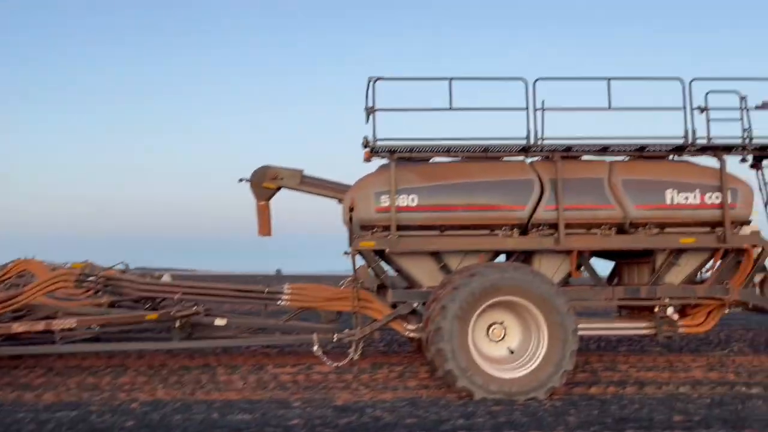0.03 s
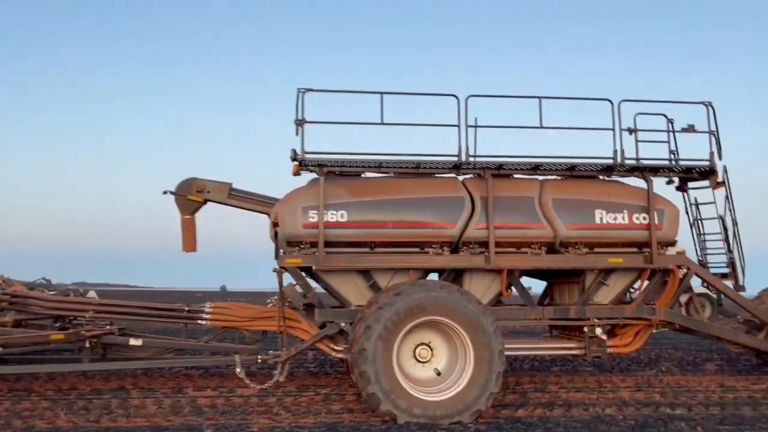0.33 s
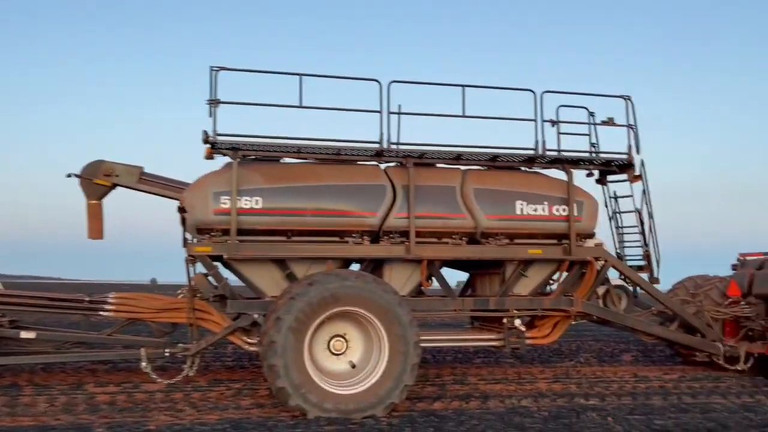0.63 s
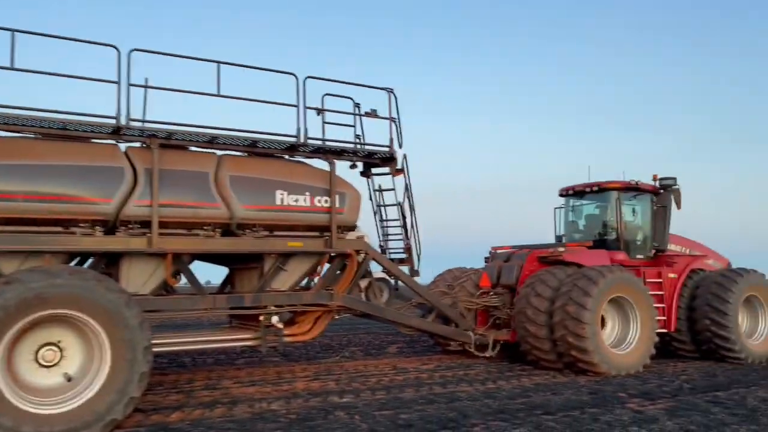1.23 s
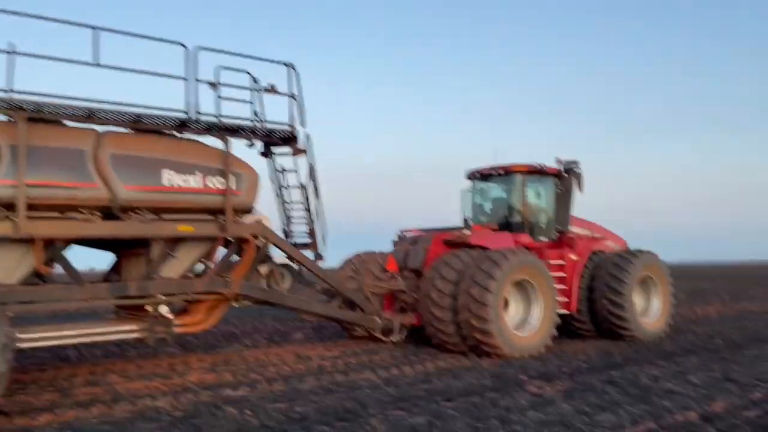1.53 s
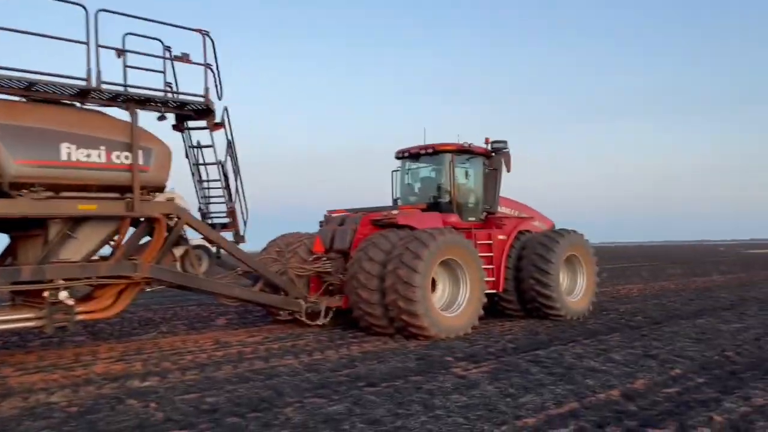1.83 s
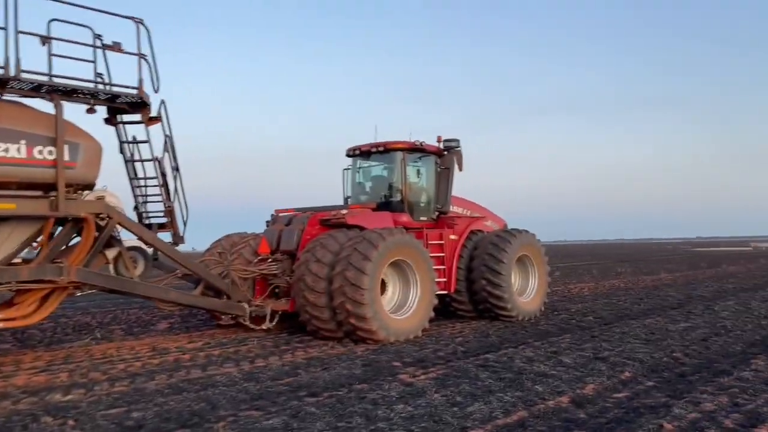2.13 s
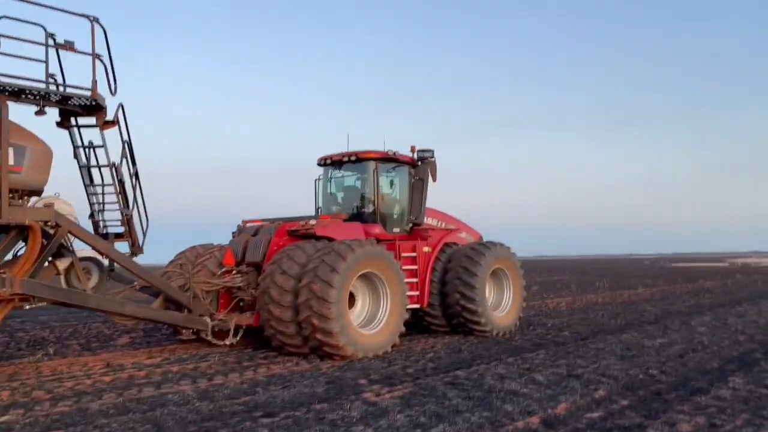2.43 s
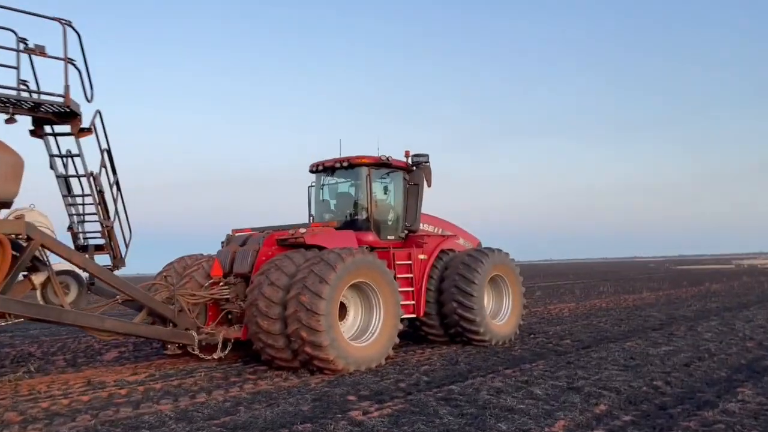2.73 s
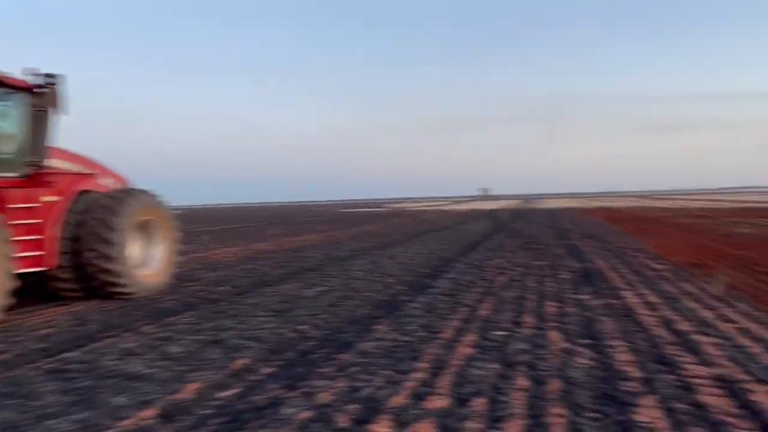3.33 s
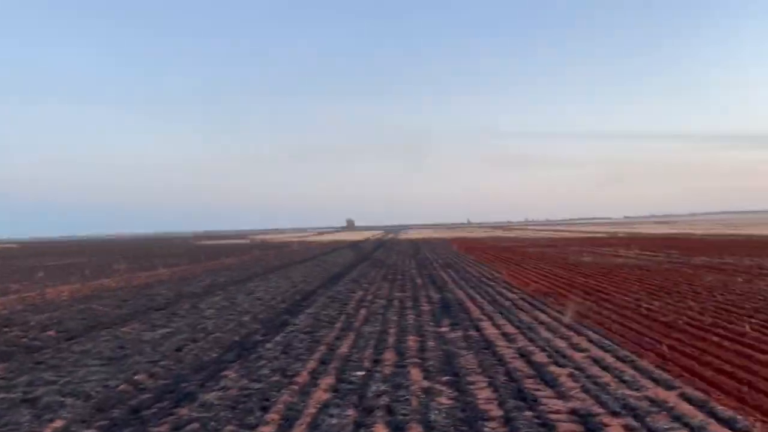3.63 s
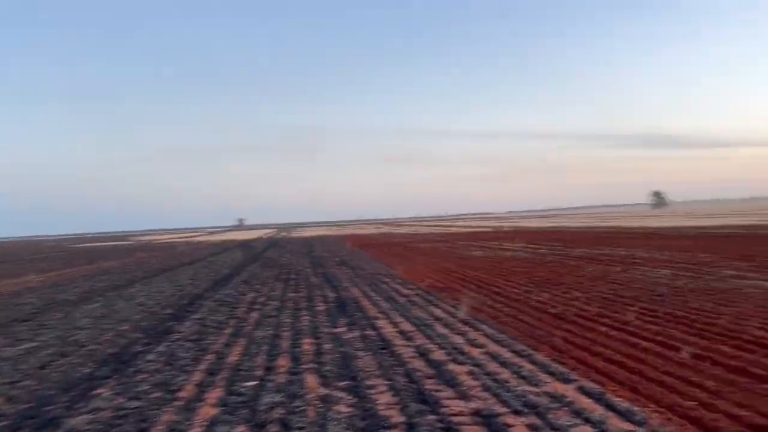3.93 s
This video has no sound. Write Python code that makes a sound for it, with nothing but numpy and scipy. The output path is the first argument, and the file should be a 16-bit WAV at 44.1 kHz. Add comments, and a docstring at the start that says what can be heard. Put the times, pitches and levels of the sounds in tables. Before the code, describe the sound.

A tractor and seeder fan drone steadily with rushing air in an open field.

```python
"""A fan sings a stack of blade tones over rushing air: a tractor tows an air seeder across a field.
The engine throbs and its gears and pumps whine, growing as the microphone swings round.
Wind bumps the microphone a few times, mostly at the start, and near the middle
the seeder's steel scrapes briefly through the soil."""
import sys
import numpy as np
from scipy import signal
from scipy.fft import rfft, irfft
from scipy.io import wavfile
from scipy.ndimage import uniform_filter1d

SR = 44100
rng = np.random.default_rng(int(sys.argv[2]) if len(sys.argv) > 2 else 0)


def materialize(psi):
    """Save the field psi as 16-bit PCM at rate SR to the path in sys.argv[1].

    A 1-D psi becomes a single channel; in a 2-D psi each row is a channel.
    """
    bounded = np.clip(np.atleast_2d(psi).T, -1, 1)
    quanta = np.round(bounded * 32767).astype(np.int16)
    wavfile.write(sys.argv[1], SR, quanta)


N = 176400
T = np.arange(N) / SR
HZ = np.fft.rfftfreq(2048, 1 / SR)


def amp(db):
    """Decibels to gain."""
    return 10 ** (np.asarray(db) / 20)


def unit(x):
    """Scales to rms 1."""
    return x / np.sqrt(np.mean(x ** 2) + 1e-20)


def curve(rows, t):
    """Every column of a time table, read at times t."""
    times, *columns = np.transpose(rows)
    return np.array([np.interp(t, times, c) for c in columns])


def spectrum(rows, hz):
    """Every column of a frequency table, read on a log axis."""
    f, *columns = np.transpose(rows)
    return np.array([np.interp(np.log(hz + 1), np.log(f + 1), c) for c in columns])


def frames(x):
    """Frame times and short-time spectra (frames, bins)."""
    _, t, z = signal.stft(x, SR, nperseg=2048, noverlap=1536)
    return t, z.T


def sound(z):
    """Short-time spectra back to samples."""
    return signal.istft(z.T, SR, nperseg=2048, noverlap=1536)[1][:N]


def drift(rate_hz):
    """Slow random motion of rms 1."""
    f = np.fft.rfftfreq(4096, 1 / 800)
    slow = irfft(rfft(rng.standard_normal(4096)) / (1 + (f / rate_hz) ** 2))
    return np.interp(T, np.arange(4096) / 800, unit(slow - slow.mean()))


def quiver(rate_hz):
    """Random trembling of rms 1 around a rate."""
    f = np.fft.rfftfreq(4096, 1 / 800) / rate_hz
    shake = irfft(rfft(rng.standard_normal(4096)) * f ** 2 / (1 + f ** 4))
    return np.interp(T, np.arange(4096) / 800, unit(shake))


def noise(colour):
    """Noise of rms 1 with the given spectrum."""
    gain = amp(spectrum(colour, np.fft.rfftfreq(N, 1 / SR))[0])
    return unit(irfft(rfft(rng.standard_normal(N)) * gain, N))


def tone(turns, flutter, flutter_hz):
    """A partial of rms 1, fluttered by moving air."""
    phase = 2 * np.pi * (turns + rng.random())
    trembling = (1 + flutter * quiver(flutter_hz)) * np.cos(phase)
    return unit(trembling + flutter * quiver(flutter_hz) * np.sin(phase))


def swells(rows):
    """Bell-shaped swells, one for each row."""
    return sum(amp(db) * np.exp(-.5 * ((T - centre) / half) ** 2) for centre, half, db in rows)


WHISTLE, SHRILL, STRONG, UPPER = 4, 6, (2, 5, 9), (10, 12, 13, 14, 15)  # harmonic numbers
# Fader rides for the fan's whistle, shrill tone and root. Each row: time in seconds, level in dB.
WHISTLE_RIDE = [(0, -47), (.2, -41), (.45, -43.5), (.68, -48), (.82, -42.5), (1.25, -45.5), (1.4, -40),
                (1.65, -43), (1.88, -39), (2.18, -46), (2.27, -42), (2.58, -42), (2.9, -51), (3.18, -39),
                (3.25, -42), (3.33, -34.5), (3.44, -43), (3.56, -34), (3.8, -48), (3.96, -36)]
SHRILL_RIDE = [(0, -49), (.95, -53), (1.15, -40), (1.36, -38.5), (1.46, -44), (2.05, -45), (2.2, -41),
               (2.33, -45), (2.41, -34), (2.52, -36), (2.62, -46), (2.95, -48), (3.14, -38), (3.26, -44.5),
               (3.4, -37), (3.54, -48), (3.62, -42)]
ROOT_RIDE = [(0, -49), (1.4, -47.5), (1.9, -44), (2.35, -38), (2.7, -39.5), (3.1, -37), (3.5, -43),
             (4, -44)]
# Rides for the STRONG and UPPER groups. Each row: time in seconds, relative dB for each harmonic.
STRONG_RIDES = [(0, -40, -53, -56), (.3, -41.5, -57, -56.5), (.75, -49, -44.5, -47.5),
                (1.05, -44, -55, -49.5), (1.55, -38, -52, -51.5), (2, -43, -57, -52.5),
                (2.5, -38, -45, -57), (2.8, -48, -39.5, -47), (3.1, -37.5, -45.5, -52),
                (3.37, -29, -42.5, -47), (3.8, -45, -53, -75), (4, -36, -48, -69)]
UPPER_RIDES = [(0, -52, -69, -62, -63, -55), (0.3, -53.5, -67, -67, -61, -57),
               (0.6, -69, -64, -61, -59, -53.5), (0.9, -58, -67, -58, -57, -49.5),
               (1.15, -63, -56, -56, -52.5, -62), (1.4, -57, -55, -52, -50.5, -49),
               (1.65, -51, -54, -61, -52, -64), (1.9, -56, -45, -49, -57, -58),
               (2.15, -51, -55, -63, -54, -54), (2.4, -55, -50, -56, -52, -54),
               (2.6, -53, -48, -59, -50, -61), (2.8, -47, -47, -46.5, -47, -48),
               (3, -55, -53, -52, -61, -47.5), (3.2, -48.5, -57, -49, -59, -54),
               (3.45, -48.5, -50, -69, -60, -54), (3.8, -60, -56, -68, -62, -51)]
# Quiet harmonics that fill out the stack. Each row: harmonic number, relative level in dB.
FILL = [(3, -61), (7, -53), (8, -57.5), (11, -56), (16, -58), (17, -54.5), (18, -52.5)]
# One ride for the fill and the faint top. Each row: time in seconds, gain in dB.
FILL_RIDE = [(0, -2), (1.5, -1.5), (2.2, 1), (2.8, 0.5), (3.3, -0.5)]


def fan_harmonics():
    """The blade tones fade in and out: (harmonic number, envelope) pairs, the whistle first."""
    solos = [(WHISTLE, WHISTLE_RIDE), (SHRILL, SHRILL_RIDE), (1, ROOT_RIDE)]
    gains = [(k, amp(curve(ride, T)[0])) for k, ride in solos]
    gains += zip(STRONG, amp(curve(STRONG_RIDES, T) - 1))
    gains += zip(UPPER, amp(curve(UPPER_RIDES, T)))
    faint_top = [(k, -62 - .4 * (k - 19)) for k in range(19, 30)]
    ride_db = curve(FILL_RIDE, T)[0]
    for k, db in FILL + faint_top:
        fade = unit(amp(2.2 * drift(rate_hz=5.3)))
        gains.append((k, amp(db + ride_db) * fade))
    return gains


# The fan's pitch. Each row: time in seconds, blade-pass rate in Hz.
FAN_PITCH = [(0, 379.8), (.8, 378.6), (1.2, 379.8), (1.7, 380.3), (2.4, 378.7), (3.1, 379.2), (4, 378.9)]
BLADES, BLADE_UNEVEN, FAN_JITTER, SHAFT_WOBBLE_RAD = 12, 0.28, 0.00067, 0.042


def fan():
    """Shuddering tones; uneven blades add shaft-rate sidebands. Returns the stack and its whistle."""
    blade_hz = curve(FAN_PITCH, T)[0] * (1 + FAN_JITTER * drift(rate_hz=4.6))
    turns = np.cumsum(blade_hz) / SR
    harmonics = fan_harmonics()
    shaft = 2 * np.pi * turns / BLADES
    turns = turns + SHAFT_WOBBLE_RAD * np.sin(shaft) / (2 * np.pi)
    shudder = 1 + 0.078 * quiver(rate_hz=21)
    partials = []
    for k, gain in harmonics:
        roughness = min(k / 6, 1)  # low harmonics stay smoother
        uneven = 1 + BLADE_UNEVEN * roughness * np.cos(shaft + 2 * np.pi * rng.random())
        blade_tone = tone(k * turns, flutter=0.17 * roughness, flutter_hz=15)
        partials.append(gain * uneven * shudder * blade_tone)
    return sum(partials[1:]), partials[0]


# Low engine throb, then the bed of gear and pump whine. Each row: pitch in Hz, relative level in dB.
ENGINE_ORDERS = [(42.8, -34.5), (85.6, -41)]
WHINE_BED = [(192.3, -45.5), (386, -47), (410, -48), (525, -43.5), (540, -44.5), (568, -49.5),
             (612.5, -45.5), (919, -43.5), (945, -49), (2142, -56.5), (6600, -58.5)]
# One ride for both. Each row: time in seconds, gain in dB.
TRACTOR_RIDE = [(0, -4), (1, -2), (2.5, -1.5), (3.2, 1.5), (3.6, 0), (4, 3)]
# Three whines that stand out. Each row: time in seconds, level in dB for each of LEAD_WHINE_HZ.
LEAD_WHINE_RIDES = [(.25, -49, -52, -51), (.75, -49.5, -42.5, -46.5), (1.25, -50, -44.5, -51),
                    (1.75, -44, -45, -49), (2.25, -44, -48, -48), (2.75, -38.5, -41, -41.5),
                    (3.2, -38, -32, -37.5), (3.75, -43, -45, -35.5)]
LEAD_WHINE_HZ, ENGINE_JITTER = (315, 630, 1225), 0.00048


def tractor():
    """Low engine orders and the tones of gears and pumps, all on one slightly unsteady speed."""
    clock = np.cumsum(1 + ENGINE_JITTER * drift(rate_hz=2.05)) / SR
    ride_db = curve(TRACTOR_RIDE, T)[0]
    throb = sum(amp(db) * tone(hz * clock, flutter=0.05, flutter_hz=12) for hz, db in ENGINE_ORDERS)
    gains = list(zip(LEAD_WHINE_HZ, amp(curve(LEAD_WHINE_RIDES, T))))
    for hz, db in WHINE_BED:
        fade = unit(amp(1.5 * drift(rate_hz=0.82)))
        gains.append((hz, amp(db + ride_db) * fade))
    whine = sum(gain * tone(hz * clock, flutter=0.12, flutter_hz=7.2) for hz, gain in gains)
    return throb * amp(0.96 * ride_db) + whine


# The colour of the rumble and rushing air. Each row: frequency in Hz, relative level in dB.
AIR_COLOUR = [(18, -90), (27, -70), (36, -54), (62, -48.3), (100, -52.8), (170, -51.5), (220, -60.5),
              (350, -60.8), (460, -63.5), (800, -62), (1000, -63), (1130, -68), (1550, -68), (1850, -73.5),
              (2300, -68.5), (2650, -71.5), (3000, -76.5), (4500, -78.5), (7000, -82.3), (8800, -81.7),
              (10500, -83.5), (14000, -85.5), (14700, -91)]
# Its three band faders. Each row: time in seconds, then rumble, roar and hiss gains in dB.
AIR_RIDES = [(0, 0, -4, -1.5), (.7, 0.9, -2.5, -1), (1.4, -1.2, -0.6, -0.2), (2, 1.3, 0, 0.9),
             (2.7, 0.6, 0.4, 3.5), (3, 0.5, 1.9, 3), (3.35, 2.5, 1.5, 0), (3.7, 2.5, 1.7, -0.5),
             (4, 2.7, -0.4, -1.5)]
RUMBLE_TO_ROAR_HZ, ROAR_TO_HISS_HZ = (170, 400), (2500, 8000)
AIR_TRIM_DB, PATCH_DB, FLICKER_DB = -1.5, 1.63, 0.51


def air():
    """Exhaust rumble, patchy machine roar and hiss in the hoses, as spectra of two unrelated noises."""
    t, rush = frames(rng.standard_normal(N))
    _, diffuse = frames(rng.standard_normal(N))
    rumble, roar, hiss = curve(AIR_RIDES, t)[:, :, None]
    above_rumble = np.interp(HZ, RUMBLE_TO_ROAR_HZ, [0, 1])
    above_roar = np.interp(HZ, ROAR_TO_HISS_HZ, [0, 1])
    ride_db = rumble + (roar - rumble) * above_rumble + (hiss - roar) * above_roar
    patches = uniform_filter1d(rng.standard_normal(rush.shape), size=8, axis=0)  # blur in time
    patches = unit(uniform_filter1d(patches, size=24, axis=1))  # and in frequency
    ride_db += PATCH_DB * patches * above_rumble
    ride_db += FLICKER_DB * rng.standard_normal((len(t), 1))
    gain = amp(AIR_TRIM_DB + spectrum(AIR_COLOUR, HZ)[0] + ride_db) * np.sqrt(SR / 2)
    return steady_bass(rush) * gain, diffuse * gain


def steady_bass(z):
    """Evens out chance swells in the low end: an engine under constant load."""
    bass = HZ < RUMBLE_TO_ROAR_HZ[0]
    power = uniform_filter1d(np.mean(abs(z[:, bass]) ** 2, axis=1), size=7)
    return np.where(bass, z / unit(np.sqrt(power))[:, None], z)


# Wind bumps. Each row: centre in seconds, half length in seconds, relative level in dB.
WIND_BUMPS = [(.122, 0.018, -14), (.205, 0.012, -19), (.25, .09, -31.5), (.3, 0.017, -18.5),
              (.347, 0.0086, -19.5), (.393, .014, -19.5), (2.52, 0.016, -29), (2.632, 0.013, -21)]
# Their boomy colour. Each row: frequency in Hz, relative level in dB.
WIND_COLOUR = [(20, -26), (45, -1.5), (70, 1.5), (120, -5.5), (200, -15), (300, -19.5), (600, -51),
               (2000, -82)]


def wind():
    """Eddies buffet the microphone: short low thumps, mostly alike in both channels."""
    eddies = noise(WIND_COLOUR)
    mid = eddies / np.sqrt(uniform_filter1d(eddies ** 2, size=1100) + 1e-3)  # levelled
    side = 0.33 * noise(WIND_COLOUR)
    return swells(WIND_BUMPS) * np.array([mid + side, mid - side])


# The scrape. Each row: centre in seconds, half length in seconds, left-channel level in dB.
SOIL_SCRAPES = [(1.82, 0.086, -40.5)]
# Its bright colour. Each row: frequency in Hz, relative level in dB.
SOIL_COLOUR = [(500, -50), (2200, 22), (3800, 42), (5000, 33), (7500, -92), (15000, -47)]


def soil():
    """Brief gritty hiss of steel dragged through dry earth, leaning left."""
    return swells(SOIL_SCRAPES) * np.array([noise(SOIL_COLOUR), amp(-3.5) * noise(SOIL_COLOUR)])


# The stereo image. Each row: frequency in Hz, left phase lead in radians before the swing,
# left minus right in dB, coherence of the noise from 0 to 1.
STEREO_IMAGE = [(60, .1, -.3, .98), (200, .55, -.3, .96), (380, 1.15, 1.5, .94), (630, 1.8, 4, .9),
                (940, 2.7, 8, .7), (1225, 2.9, 1.5, .6), (1520, 4.1, -2.5, .45), (1850, 6.5, 5, .65),
                (2300, 6.6, 3, .8), (3400, 7.4, 4.5, .5), (4600, 7.5, 6.5, .35), (5600, 5.8, 3.5, .5),
                (7000, 4.6, .5, .7), (7800, 3.3, 0, .95), (8800, 3, 0, .95), (10000, 1.3, 0, .75),
                (11300, .2, 0, .88), (12700, -.1, 0, .88), (13700, -1.2, 0, .7), (14700, -3.14, 0, .98)]
# The machines swing to the left. Each row: time in seconds, factor on the lead below SWING_BELOW_HZ.
LEFT_SWING = [(0, 0.38), (.8, 0.28), (1.5, 0.57), (2.6, 0.86), (3.1, 0.99), (3.5, 1.17), (4, 1.13)]
SWING_BELOW_HZ = 1380


def microphones(tones, rush, diffuse):
    """The left side hears the machines mostly earlier and louder; diffuse noise adds width."""
    t, direct = frames(tones)
    lead, balance_db, coherence = spectrum(STEREO_IMAGE, HZ)
    lead = lead * np.where(HZ < SWING_BELOW_HZ, curve(LEFT_SWING, t).T, 1)
    balance = amp(balance_db)
    equal_power = np.sqrt(2 / (1 + balance ** 2))
    left = (direct + rush) * balance
    right = (direct + coherence * rush + np.sqrt(1 - coherence ** 2) * diffuse) * np.exp(-1j * lead)
    return np.array([sound(left * equal_power), sound(right * equal_power)])


# The whistle's own pan. Each row: time in seconds, left phase lead in radians, left minus right in dB.
WHISTLE_PAN = [(.4, 4.7, 1), (.85, 5.8, 1), (1.1, 2.6, 2), (1.9, 2.4, -5), (2.7, 4.2, 1), (3.2, 4.7, -4.5)]


def wander(whistle):
    """The whistle shifts from side to side as the microphone moves through its sound field."""
    lead, balance_db = curve(WHISTLE_PAN, T)
    right = (signal.hilbert(whistle) * np.exp(-1j * lead)).real
    return np.array([whistle * amp(balance_db / 2), right * amp(-balance_db / 2)])


def scene():
    """The stereo mix of machines, wind and soil."""
    stack, whistle = fan()
    machines = microphones(stack + tractor(), *air())
    return machines + wander(whistle) + wind() + soil()


def record(dry):
    """A low cut at 33 Hz and a steep high cut at 15.7 kHz."""
    low_cut = signal.butter(6, 33, "high", fs=SR, output="sos")
    high_cut = signal.firwin(511, 15700, window=("kaiser", 9), fs=SR)
    return signal.oaconvolve(signal.sosfilt(low_cut, dry), high_cut[None], "same")


dry = scene()
out = record(dry)
materialize(out)
```